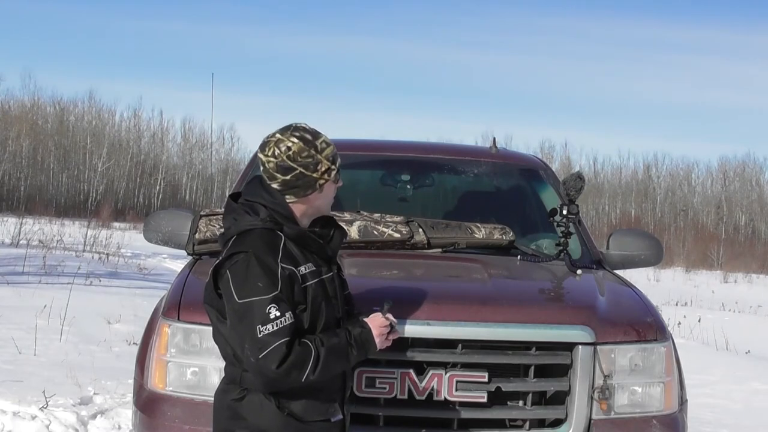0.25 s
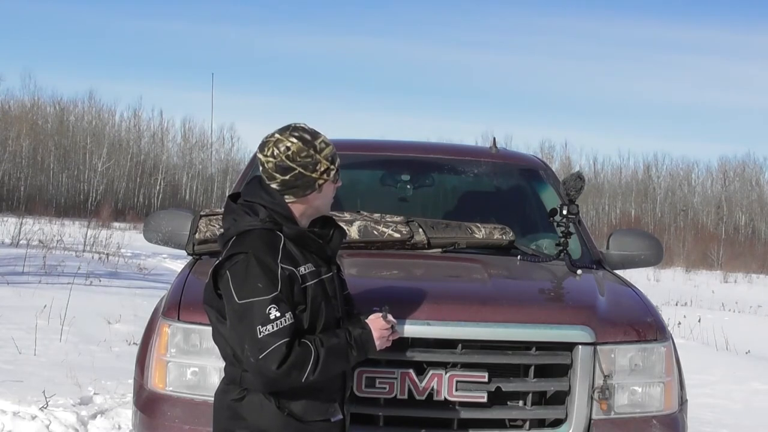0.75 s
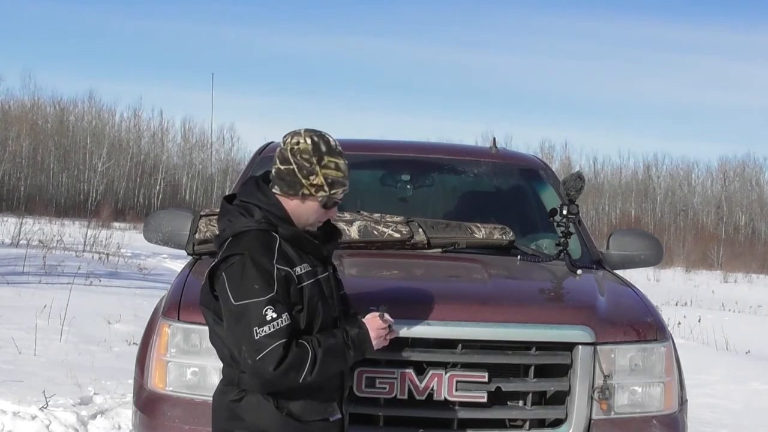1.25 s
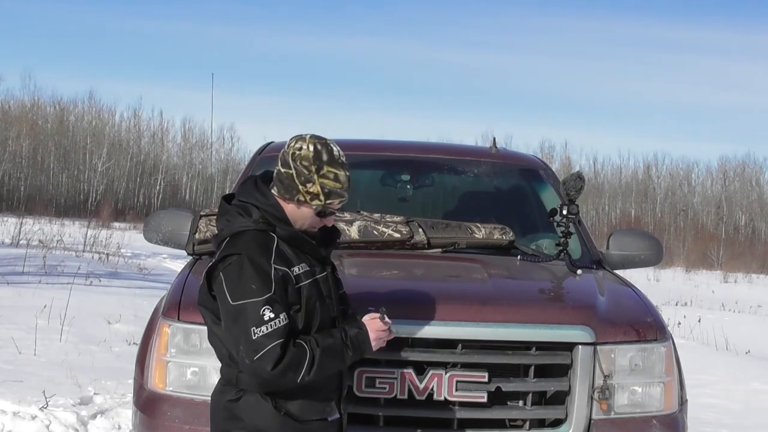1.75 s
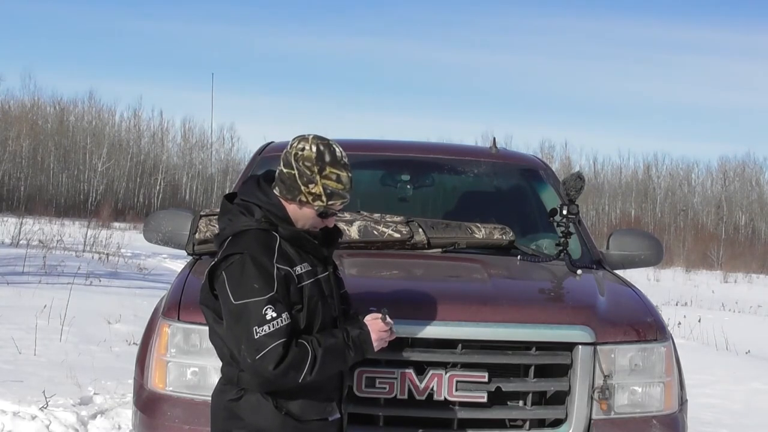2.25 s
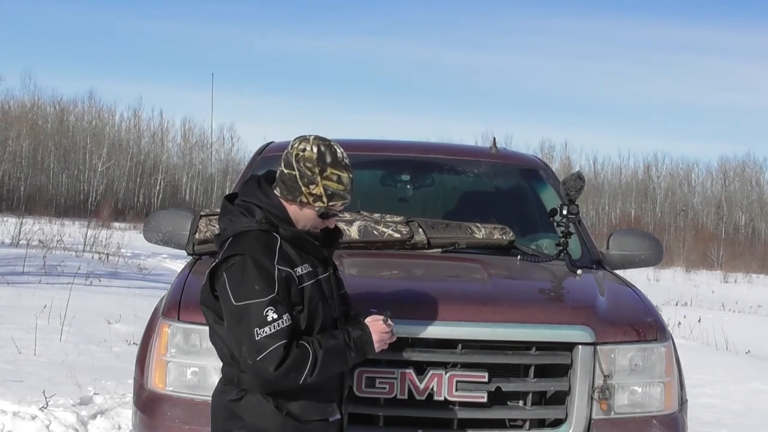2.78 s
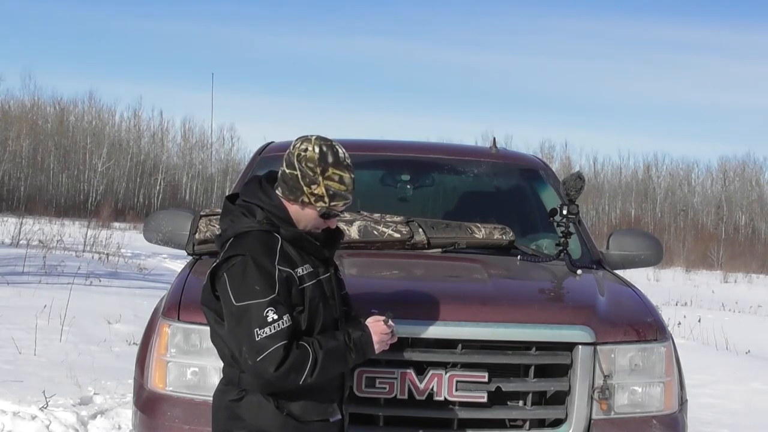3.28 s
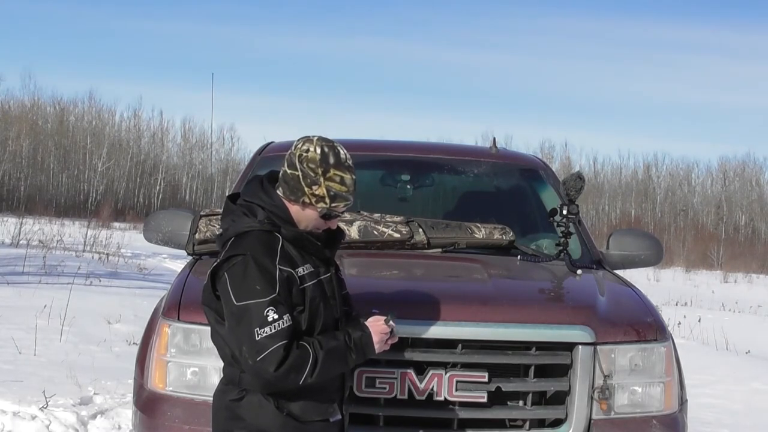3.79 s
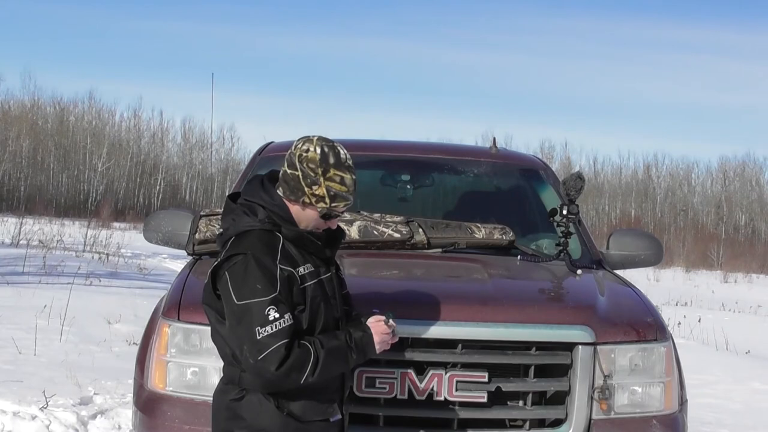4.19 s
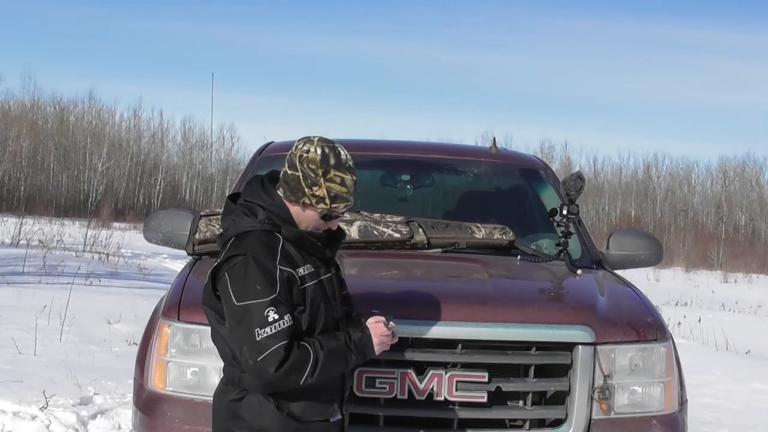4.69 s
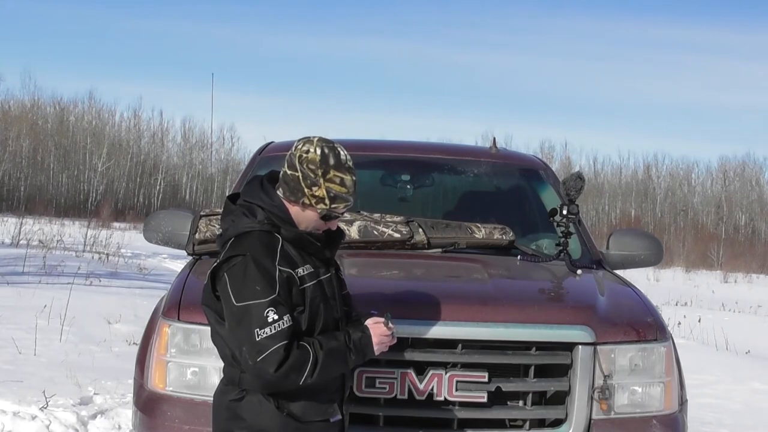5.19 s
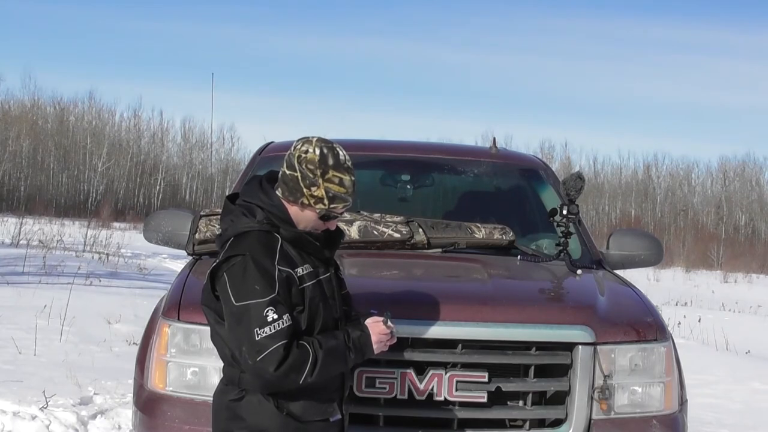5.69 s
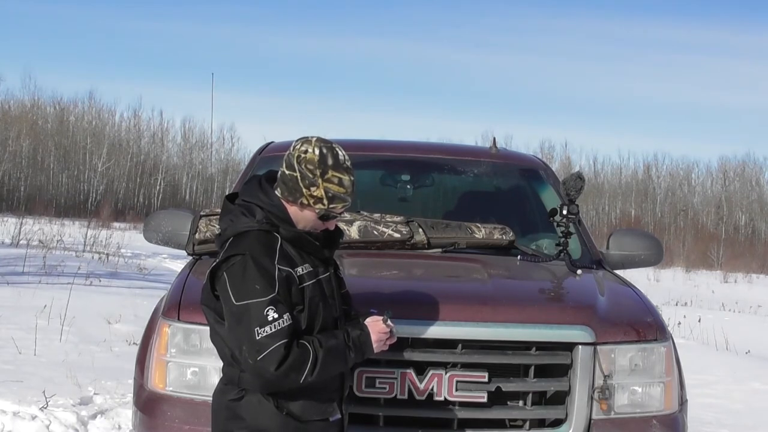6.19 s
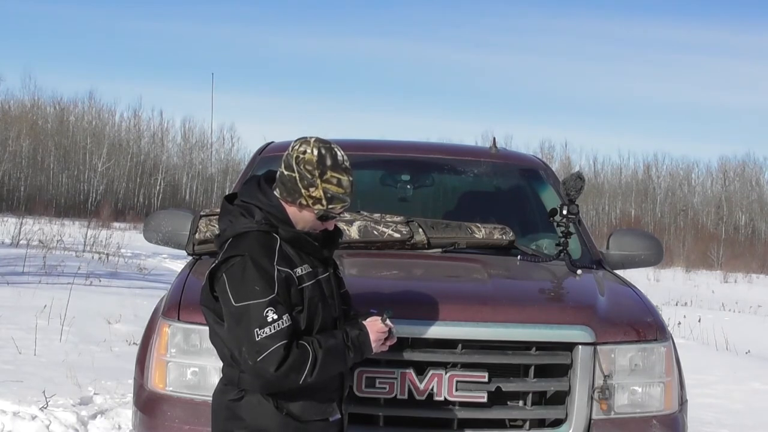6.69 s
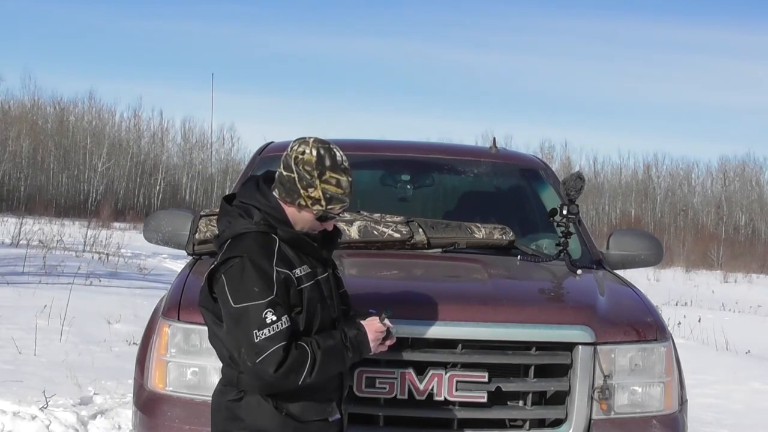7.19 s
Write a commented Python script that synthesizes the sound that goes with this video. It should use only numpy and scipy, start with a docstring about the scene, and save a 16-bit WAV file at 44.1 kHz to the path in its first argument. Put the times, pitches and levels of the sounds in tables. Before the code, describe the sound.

In an open snowy field, someone works a hand-held friction turkey call close to the microphone. A short run of raspy yelps is followed, after a brief pause, by a longer one. The striker gives one damped tick, then plays thin, squeaky clucks. Far trees echo faintly. A thick jacket swishes and crumples throughout, with occasional soft low bumps over light wind and hiss.

```python
"""Light wind and faint hiss in a snowy field; the caller's jacket swishes and crumples throughout.
From 0.2 s a hand-held friction turkey call gives two runs of raspy yelps: the striker sticks and slips,
each slip rings the small sound chamber, far trees echo faintly. Folds of cloth buckle in between, and
soft low bumps come now and then from 1.4 s. At 5.1 s the striker gives one short, damped tick;
from 5.4 s it plays thin, squeaky clucks."""
import sys
import numpy as np
from scipy import signal
from scipy.fft import rfft, irfft, next_fast_len
from scipy.io import wavfile
from scipy.ndimage import uniform_filter1d, map_coordinates

SR = 44100
rng = np.random.default_rng(int(sys.argv[2]) if len(sys.argv) > 2 else 0)


def output_pcm(signal):
    """Save a mono or channel-first signal as 16-bit PCM at the path in sys.argv[1].

    Samples are clipped to [-1, 1] before scaling.
    """
    pcm = np.clip(np.atleast_2d(signal).T, -1, 1) * 32767
    wavfile.write(sys.argv[1], SR, np.round(pcm).astype(np.int16))


N = 328545
TIME_S = np.arange(N) / SR
FFT_SIZE = next_fast_len(N + SR, real=True)
FREQ_HZ = np.fft.rfftfreq(FFT_SIZE, 1 / SR)

# noise spectra (frequency [Hz], relative density [dB])
WIND_SPECTRUM = [(25, -3), (70, -1), (150, -0.5), (500, -15.5), (1500, -22), (4000, -29)]
HISS_SPECTRUM = [(300, -6), (2000, -8.5), (5200, -15.5), (7000, -11.5), (10500, -2.5), (15500, -6.5)]
CRUMPLE_SPECTRUM = [(25, -16.5), (70, -5.5), (150, -2.5), (400, 0.5), (750, 0.5), (1100, -6.5), (1600, -17),
                    (2500, -19), (5000, -28.5), (10000, -51)]
SWISH_SPECTRUM = [(500, -34.5), (2000, -8.5), (4000, -9), (5200, -8), (7000, 2.5), (8500, 2),
                  (11000, -10.5), (15500, -9)]
RUB_SPECTRUM = [(200, -41), (450, -13), (620, -7), (800, -11), (1000, -21.5), (3000, -51)]
BRUSH_SPECTRUM = [(300, -3.5), (1200, 4.5), (2700, -2), (3900, 2.5), (5000, -10), (6700, 0), (10000, -15),
                  (15500, -19)]
FOLD_SPECTRUM = [(40, -23.5), (130, 7), (350, 7), (800, 4), (1400, -14.5), (2500, -23), (4200, -21.5),
                 (5200, -24.5), (7000, -18.5), (15000, -44.5)]
# stereo width of the noises and of the call (frequency [Hz], side over mid [dB])
NOISE_WIDTH = [(30, 5), (70, -1), (250, -4), (700, -6), (4000, -14), (6500, -24.5), (8500, -0.5),
               (13000, 2)]
CALL_WIDTH = [(1300, -17.5), (2200, -15), (4500, -58), (6800, -43), (8500, -23)]
# jacket's steady crumple and shell swish (time [s], relative level [dB])
CRUMPLE_LEVELS = [(0, -54.5), (.6, -50.5), (.85, -51.5), (1.55, -48.5), (1.72, -44), (2.0, -48.5),
                  (2.48, -52.5), (2.58, -41.5), (2.98, -45), (3.03, -55.5), (3.13, -47.5), (3.85, -44.5),
                  (4.15, -50), (4.6, -49.5), (4.97, -58), (5.6, -46.5), (6.8, -57), (7.45, -51.5)]
SWISH_LEVELS = [(0, -69.5), (.88, -65.5), (1.03, -56), (1.24, -65), (1.55, -63.5), (1.8, -58.5), (2.3, -61),
                (2.68, -51.5), (3.05, -61), (3.4, -70), (3.56, -55), (4.12, -64.5), (4.35, -58),
                (4.6, -71.5), (4.97, -73.5), (6.2, -69), (6.85, -74), (7.45, -65.5)]
# hollow rubs, arm shifts, sleeve brushes (time [s], length [s], relative level [dB])
RUBS = [(.13, 0.025, -50), (.38, 0.065, -45.5), (.47, 0.011, -43.5), (5.53, 0.031, -45.5),
        (5.68, 0.15, -46.5), (5.82, 0.05, -44)]
ARM_SHIFTS = [(1.1, 0.019, -40), (2.19, 0.055, -43), (3.24, 0.034, -41), (3.37, 0.026, -49),
              (4.3, 0.15, -42), (4.425, .04, -37.5), (4.745, .025, -40.5), (4.83, 0.058, -43.5),
              (5.13, 0.09, -44.5), (5.275, 0.043, -42), (5.77, 0.079, -41), (6.07, 0.034, -43),
              (6.28, 0.037, -40), (6.38, .025, -42.5), (6.65, 0.053, -53.5)]
SLEEVE_BRUSHES = [(2.768, 0.0027, -45), (4.29, 0.12, -47), (4.447, .012, -49.5), (4.735, 0.033, -50.5),
                  (5.025, 0.004, -51.5), (5.505, 0.011, -48.5), (5.68, 0.064, -43.5), (5.87, 0.0252, -59),
                  (5.91, 0.0029, -48), (5.942, 0.036, -52.5), (6.0, 0.003, -40), (6.035, 0.027, -47),
                  (6.12, 0.0096, -52.5), (6.2, 0.02, -45), (6.28, 0.049, -48.5), (6.38, 0.021, -49.5),
                  (6.43, 0.023, -54), (6.63, 0.073, -54), (6.93, 0.045, -50.5), (7.18, 0.028, -54),
                  (7.42, 0.025, -53)]
# yelp strokes (start [s], length [s], first slip rate [Hz], slowest slip rate [Hz], force [dB],
# swell up to it [dB], bite [s], release [s], breakaway [dB])
YELPS = [ (0.218, 0.11, 505, 295, 28.5, 11.5, 0.061, .035, 9),
         (.511, 0.13, 470, 280, 28.5, 7, 0.086, .022, 2.5), (.803, 0.1, 417, 233, 21, 8, .023, 0.029, 2),
         (1.025, 0.094, 440, 262, 24, 14, 0.022, 0.019, 1.5),
         (1.242, 0.063, 444, 270, 24.5, 16, 0.03, .028, 9.5),
         (1.619, .103, 620, 267, 29, 11, .025, 0.056, 9.5),
         (1.878, 0.099, 460, 293, 32, 9.5, 0.025, 0.036, -1.5),
         (2.124, 0.093, 454, 280, 32, 13.5, .02, 0.031, 5),
         (2.367, 0.11, 435, 215, 30, 11.5, .016, .038, 1), (2.619, .095, 455, 252, 31.5, 13, .018, .04, -2),
         (2.872, 0.12, 440, 261, 28.5, 10.5, .018, .046, 4.5),
         (3.156, 0.11, 436, 240, 30, 11, .024, 0.048, 0),
         (3.428, .105, 468, 256, 29, 12.5, 0.023, 0.039, 2),
         (3.7, 0.12, 505, 275, 29, 7.5, 0.022, 0.047, 1),
         (3.976, .102, 420, 230, 28.5, 6.5, 0.017, .041, 2),
         (4.247, 0.11, 502, 220, 29, 8, .042, 0.045, -1), (4.52, 0.067, 415, 225, 28, 10, .018, 0.033, 1.5),
         ]
# broad colour of the call (frequency [Hz], gain [dB])
CHAMBER_COLOUR = [(100, -64), (400, -38.5), (900, -38), (1050, -26.5), (1200, -8.5), (1450, -12.5),
                  (1600, -26), (2250, -39.5), (2500, -52.5), (3500, -59), (5300, -59), (7300, -49.5),
                  (10000, -64.5), (16000, -90)]
# its resonances and notches (frequency [Hz], width [Hz], lift [dB])
CHAMBER_MODES = [(1215, 137, 5), (1312, 82, 7), (1463, 93, 4), (3650, 270, -1.5), (4020, 230, 6.5),
                 (4320, 55, 10.5), (4715, 320, 14.5), (5360, 280, -9), (5840, 140, 6.5), (6770, 180, 5),
                 (6990, 180, 7)]
# echo decay of the trees (frequency [Hz], T60 [s])
TREE_DECAY = [(200, .6), (1300, 2.73), (8000, 2.25)]
# largest buckling folds (time [s], relative peak [dB])
FOLDS = [(0.416, -34.5), (1.818, -35.5), (1.851, -37.5), (2.043, -34), (2.247, -34), (2.32, -27.5),
         (2.475, -27), (2.915, -28), (2.989, -31), (3.128, -29.5), (3.189, -28.5), (3.345, -29.5),
         (3.396, -28), (3.841, -25.5), (4.219, -27), (4.722, -22.5), (5.249, -33.5), (5.499, -31.5),
         (5.741, -25), (5.94, -25), (5.993, -33.5), (6.043, -20.5), (6.263, -25), (6.369, -26.5)]
# low bumps (time [s], length [s], level [dB], centre pitch [Hz])
BUMPS = [(1.425, 0.048, -41, 104), (3.39, 0.068, -47.5, 92), (4.83, 0.096, -47.5, 85),
         (5.17, 0.084, -50, 120), (6.64, 0.043, -42.5, 88.5), (6.85, 0.087, -55, 160),
         (7.13, 0.047, -48.5, 155), (7.35, 0.067, -50, 157.6)]
# one short, damped tick of the striker (time [s], force [dB])
TICK_PULSES = [(5.0732, 25.5), (5.0751, 21)]
# rounder colour of tick and clucks (frequency [Hz], gain [dB])
LIGHT_COLOUR = [(900, 4), (1250, 1.5), (1800, 1), (2700, 5), (4000, -3), (8000, -15.5)]
# light, fast strokes (start [s], length [s], lowest slip rate [Hz], held slip rate [Hz], force [dB],
# sag after the catch [dB], limp: strong/weak alternation of slips [0-1])
CLUCKS = [ (5.442, 0.038, 870, 880, 10, -7, 0.13), (5.566, 0.069, 750, 824, 22, 10, 0.9),
          (5.744, 0.064, 744, 818, 21, 1, 0.25), (6.046, .04, 786, 905, 28.5, 4.5, 0),
          (6.255, 0.067, 866, 943, 24.5, 2.5, 0.05), (6.474, 0.064, 865, 945, 26.5, 3.5, 0.38),
          (6.679, .073, 832, 922, 27.5, 2.5, 0), (6.979, 0.074, 840, 948, 28, 4, 0.03),
          (7.27, .067, 855, 975, 30.5, 7, 0), ]


def amp(db):
    """Decibels to gain."""
    return 10 ** (np.asarray(db) / 20)


def unit_rms(x):
    """Scale to rms 1."""
    return x / np.sqrt(np.mean(x ** 2) + 1e-20)


def curve(points, hz=FREQ_HZ):
    """Interpolate (Hz, value) points on a log axis."""
    knots_hz, values = np.transpose(points)
    return np.interp(np.log(hz + 1), np.log(knots_hz + 1), values)


def filtered(x, response):
    """Apply a frequency response."""
    return irfft(rfft(x, FFT_SIZE) * response, FFT_SIZE)[..., :N]


def min_phase(gain_db):
    """Causal response: rings only after a blow."""
    cepstrum = irfft(np.log(amp(gain_db)), FFT_SIZE)
    cepstrum[1:FFT_SIZE // 2] *= 2
    cepstrum[FFT_SIZE // 2:] = 0
    return np.exp(rfft(cepstrum))


def wobble(rate_hz):
    """Smooth random curve, rate_hz knots a second."""
    return map_coordinates(rng.standard_normal(int(N * rate_hz / SR) + 4), [TIME_S * rate_hz])


def level(rows):
    """(s, dB) points to gain per sample."""
    return amp(np.interp(TIME_S, *np.transpose(rows)))


def swells(rows):
    """Sum of bell envelopes, one per (s, length, dB) row."""
    return sum(amp(db) * np.exp(-2 * ((TIME_S - at_s) / length_s) ** 2) for at_s, length_s, db in rows)


def stereo_noise(spectrum, envelope=1):
    """Enveloped, coloured noise with independent mid and side."""
    colour = min_phase(20 * np.log10(unit_rms(amp(curve(spectrum)))))
    mid, side = envelope * rng.standard_normal((2, N))
    mid = filtered(mid, colour)
    side = filtered(side, colour * amp(curve(NOISE_WIDTH)))
    return np.array([mid + side, mid - side])


def clumped_noise(spectrum, depth, rate_hz):
    """Stereo noise in random clumps."""
    clumps_db = 1.78 * depth * np.tanh(wobble(rate_hz) / 2)
    return stereo_noise(spectrum, unit_rms(amp(clumps_db)))


def background(wind_db=-63, hiss_db=-66):
    """Light wind rumble and steady hiss."""
    wind = clumped_noise(WIND_SPECTRUM, depth=1.5, rate_hz=3.7)
    return amp(wind_db) * wind + amp(hiss_db) * stereo_noise(HISS_SPECTRUM)


def arm_speed(peak_share=0.68, pull_share=0.16):
    """One quick pull per yelp, 0-1."""
    return swells([(start_s + peak_share * length_s, pull_share * length_s, 0)
                   for start_s, length_s, *_ in YELPS])


def jacket(crumple_db=-3, swish_db=3, shift_swish_db=-21, pull_db=5):
    """Thick cloth crumples, its shell swishes; both come in fits and grow as the arm moves."""
    shifts = swells(ARM_SHIFTS)
    fits_db = 3 * np.tanh(wobble(16))
    crumpling = amp(fits_db) * level(CRUMPLE_LEVELS) + shifts
    crumple = amp(crumple_db) * crumpling * clumped_noise(CRUMPLE_SPECTRUM, depth=5, rate_hz=90)
    sliding = amp(pull_db * arm_speed() + fits_db / 2) * level(SWISH_LEVELS)
    sliding += amp(shift_swish_db) * shifts
    swish = amp(swish_db) * sliding * clumped_noise(SWISH_SPECTRUM, depth=4.5, rate_hz=400)
    brushes = swells(SLEEVE_BRUSHES) * clumped_noise(BRUSH_SPECTRUM, depth=3.5, rate_hz=220)
    rubs = swells(RUBS) * clumped_noise(RUB_SPECTRUM, depth=1, rate_hz=84)
    return crumple + swish + brushes + rubs


def pulses(times_s, sizes):
    """Band-limited impulses between samples."""
    centres = times_s[:, None] * SR
    taps = centres.astype(int) + np.arange(-7, 9)
    kernel = np.sinc(taps - centres) * np.sinc((taps - centres) / 8)
    return np.bincount(np.clip(taps, 0, N - 1).ravel(), (sizes[:, None] * kernel).ravel(), N)


def stick_slip(gesture, jitter, wander, scatter_db, breakaway_db, creep_db=-18, creep_s=0.0055):
    """One uneven pulse per slip. Gesture: (time [s], slip rate [Hz], force [dB], optional limp [0-1])."""
    knots_s, rate_hz, force_db, *limp = np.transpose(gesture)
    knots_s = np.sort(knots_s)
    t = np.arange(knots_s[0] - creep_s, knots_s[-1], 1 / SR)
    # rough and smooth spots vary the pace
    spots = map_coordinates(rng.standard_normal(64), [(t - t[0]) * 180], mode="wrap")
    pace_hz = np.interp(t, knots_s, rate_hz) * np.exp(wander * spots)
    cycles = np.cumsum(pace_hz) / SR
    cycles -= np.interp(knots_s[0], t, cycles)
    slip = np.arange(np.ceil(cycles[0]), cycles[-1]).astype(int)
    slip_s = np.interp(slip, cycles, t)
    slip_hz = np.interp(slip_s, knots_s, rate_hz)
    time_noise, size_noise = rng.standard_normal((2, len(slip)))
    sizes = amp(np.interp(slip_s, knots_s, force_db) + scatter_db * size_noise)
    # faint creep, then the breakaway slip
    sizes *= amp(creep_db * (slip < 0) + breakaway_db * (slip == 0))
    if limp:  # the fastest slips alternate: lines halfway between the harmonics
        hurry = np.interp(slip_hz, [830, 910], [0, 1])
        sizes *= 1 + hurry * np.interp(slip_s, knots_s, limp[0]) * np.cos(np.pi * slip)
    return pulses(slip_s + jitter * time_noise / slip_hz, sizes)


def yelp(start_s, length_s, first_hz, slow_hz, force_db, swell_db, bite_s, release_s, breakaway_db):
    """The striker slips ever slower and harder, then speeds up as it lifts."""
    end_s = start_s + length_s
    gesture = [(start_s, first_hz, force_db - swell_db),
               (start_s + 0.5 * bite_s, 0.88 * first_hz, force_db - swell_db + 1.5),  # skate
               (start_s + bite_s, 1.1 * slow_hz, force_db - 0.42 * swell_db),  # bite
               (end_s - release_s, slow_hz, force_db),
               (end_s - 0.45 * release_s, 1.45 * slow_hz, force_db - 3.5),  # ease
               (end_s, 673.3, force_db - 12)]  # lift
    return stick_slip(gesture, jitter=0.01, wander=0.022, scatter_db=1.6, breakaway_db=breakaway_db)


def scrape(slips, firm_db=8, fade_s=0.00076):
    """Rough surfaces hiss after each slip, more under a firm hand, up to a limit."""
    sliding = signal.lfilter([1], [1, -np.exp(-1 / (fade_s * SR))], np.abs(slips))
    pressure = np.sqrt(np.abs(uniform_filter1d(slips ** 2, size=SR // 50)))
    firmness = np.tanh(pressure / amp(firm_db))
    colour_db = curve([(1300, -21.5), (3000, -2), (4500, -3.5), (7000, 1.5)])
    return filtered(firmness * sliding * rng.standard_normal(N), amp(colour_db))


def chamber(drive):
    """The call's small cavity rings at its resonances."""
    lift_db = sum(db / (1 + (2 * (FREQ_HZ - hz) / width_hz) ** 2) for hz, width_hz, db in CHAMBER_MODES)
    return filtered(drive, min_phase(curve(CHAMBER_COLOUR) + lift_db))


def turkey_call(yelp_scrape_db=-12, cluck_scrape_db=-21, tick_scrape_db=-3):
    """Slips, tick and their scrape drive the chamber."""
    yelps = sum(yelp(*row) for row in YELPS)
    tick = striker_tick()
    clucks = sum(cluck(*row) for row in CLUCKS)
    drive = amp(yelp_scrape_db) * scrape(yelps)
    drive += amp(cluck_scrape_db) * scrape(clucks)
    drive += amp(tick_scrape_db) * scrape(tick)
    drive += filtered(yelps, min_phase(curve([(2500, 0.22), (7000, -0.57)])))
    drive += filtered(tick + clucks, min_phase(curve(LIGHT_COLOUR)))
    return chamber(drive)


def tree_echo(x):
    """Far trees return a thin, long tail, different in each ear."""
    hz, t, noise = signal.stft(rng.standard_normal((2, SR)), SR, nperseg=256)
    decay = amp(-60 * t / curve(TREE_DECAY, hz)[:, None])
    _, tail = signal.istft(noise * decay, SR, nperseg=256)
    return signal.fftconvolve(x[None], tail / np.linalg.norm(tail[0]), axes=1)[:, :N]


def folds(t60_s=0.051, gain_db=-5):
    """Each buckling fold gives a short, dull puff."""
    envelope = sum(amp(db + gain_db - 60 * np.abs(TIME_S - at_s) / t60_s) * (TIME_S >= at_s)
                   for at_s, db in FOLDS)
    return stereo_noise(FOLD_SPECTRUM, envelope)


def bumps(sink_oct_per_s=4, waver_oct=0.14):
    """Dull, unsteady booms of sinking pitch."""
    out = np.zeros(N)
    for at_s, length_s, db, hz in BUMPS:
        glide_oct = np.clip(sink_oct_per_s * (at_s - TIME_S), -1, 1)
        pitch_hz = hz * 2 ** (glide_oct + waver_oct * wobble(70))
        out += swells([(at_s, length_s, db)]) * np.sin(2 * np.pi * np.cumsum(pitch_hz) / SR)
    return out


def striker_tick():
    """One short, damped tick of the striker; the second pulse cancels the chamber's ringing."""
    times_s, force_db = np.transpose(TICK_PULSES)
    return pulses(times_s, amp(force_db))


def cluck(start_s, length_s, low_hz, held_hz, force_db, sag_db, limp, catch_s=0.009, flick_s=0.012):
    """The loose striker skids in, catches, climbs in pitch and flicks off."""
    caught_s, end_s = start_s + catch_s, start_s + length_s
    climb_s = length_s - catch_s - flick_s
    held_db = force_db - sag_db
    gesture = [(start_s, 1.2 * low_hz, force_db - 14.5, 0.72),  # skid
               (caught_s, low_hz, force_db, 0),
               (caught_s + 0.4 * climb_s, low_hz + 0.59 * (held_hz - low_hz), held_db, 0),  # climb
               (end_s - flick_s, held_hz, held_db, limp),
               (end_s, 1.16 * held_hz, held_db - 15.5, 0)]  # flick
    return stick_slip(gesture, jitter=0.0017, wander=0.0078, scatter_db=0.45, breakaway_db=-3)


def scene(echo_db=-30):
    """Call close and slightly left, over echo, cloth, bumps and wind."""
    call = turkey_call()
    side = filtered(call, amp(curve(CALL_WIDTH)))
    direct = np.array([call + side, call - side])
    cloth = (jacket() + folds()) * amp([[0.4], [-0.4]])
    return direct + amp(echo_db) * tree_echo(call) + cloth + bumps() + background()


def record(dry, cutoff_hz=15830):
    """Brick-wall low-pass."""
    return filtered(dry, FREQ_HZ < cutoff_hz)


dry = scene()
out = record(dry)
output_pcm(out)
```